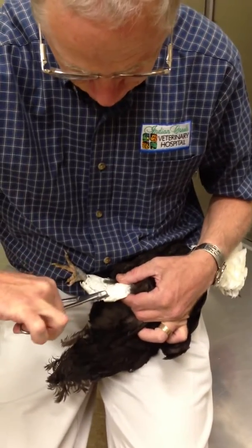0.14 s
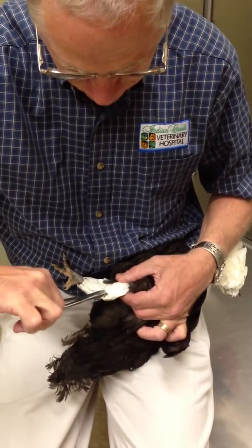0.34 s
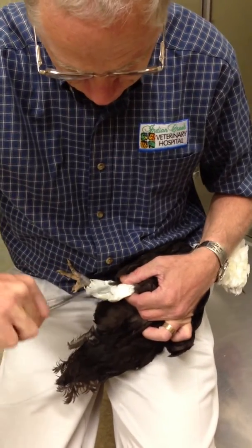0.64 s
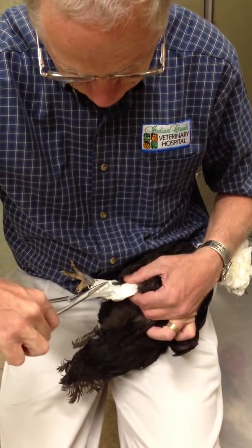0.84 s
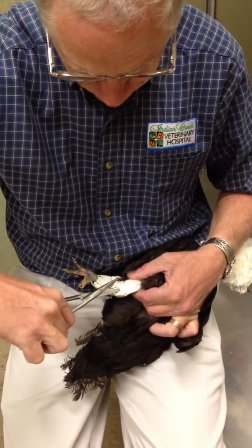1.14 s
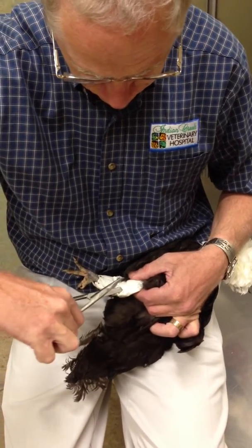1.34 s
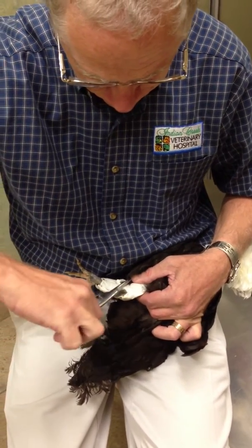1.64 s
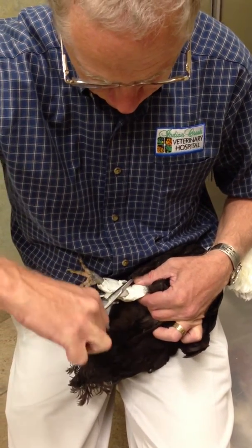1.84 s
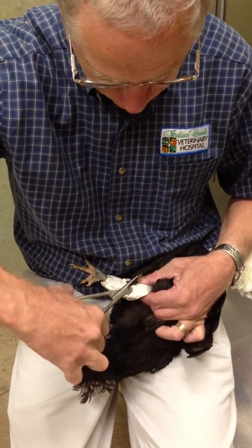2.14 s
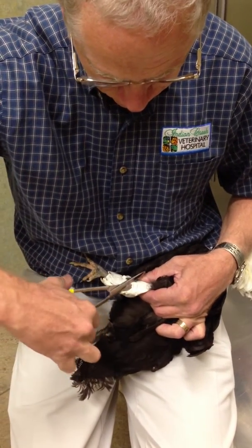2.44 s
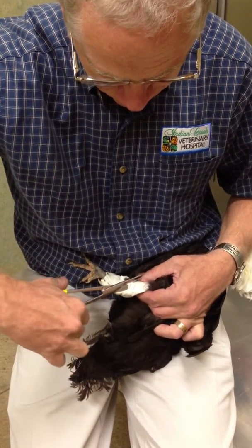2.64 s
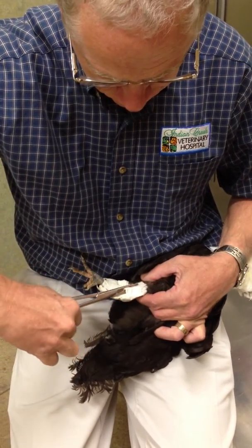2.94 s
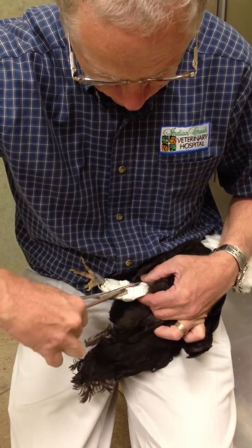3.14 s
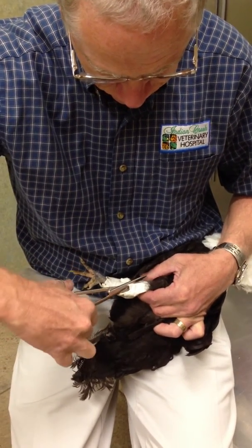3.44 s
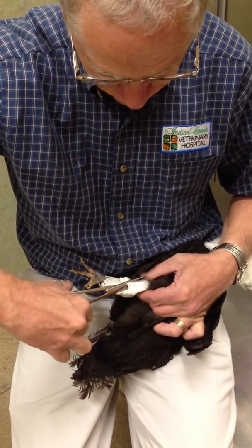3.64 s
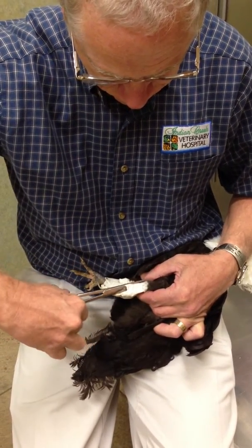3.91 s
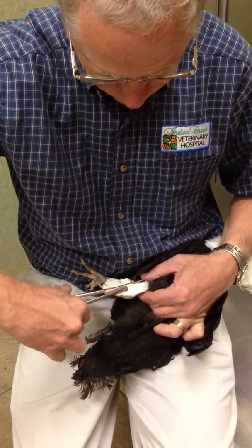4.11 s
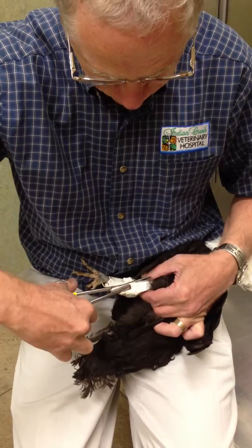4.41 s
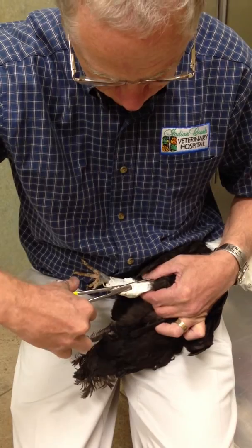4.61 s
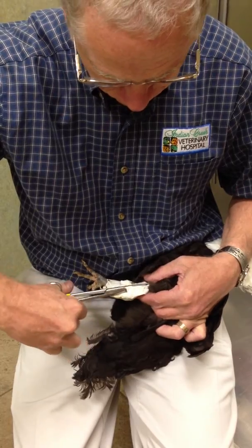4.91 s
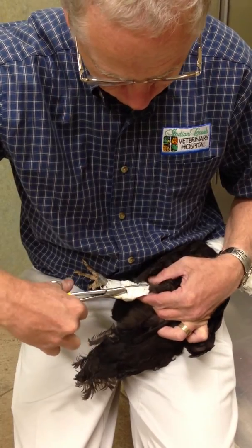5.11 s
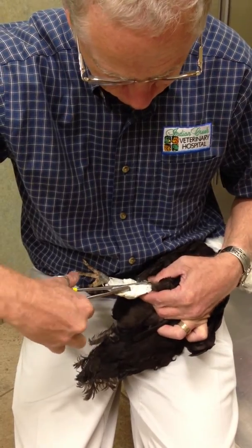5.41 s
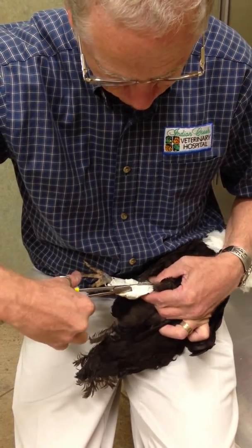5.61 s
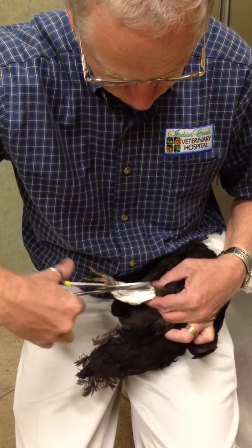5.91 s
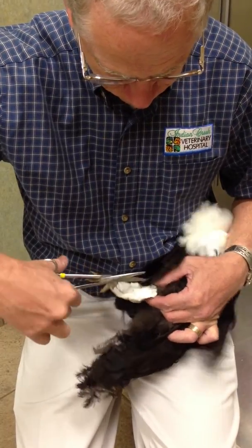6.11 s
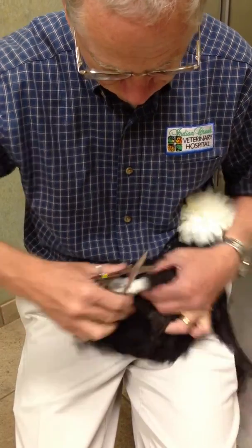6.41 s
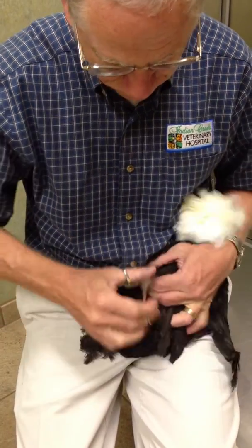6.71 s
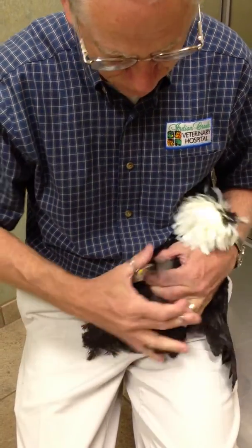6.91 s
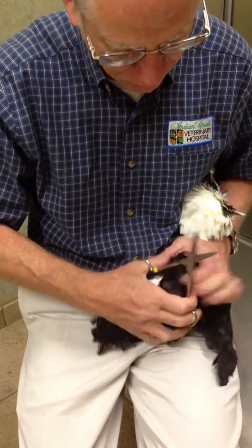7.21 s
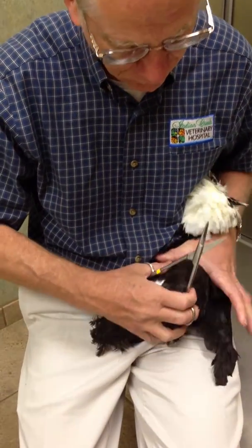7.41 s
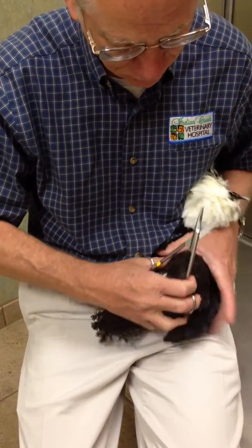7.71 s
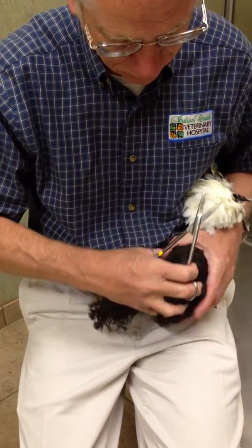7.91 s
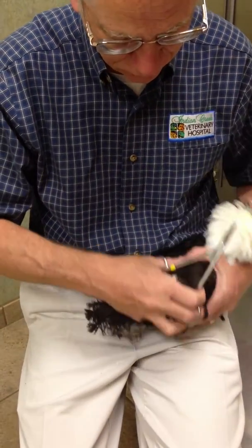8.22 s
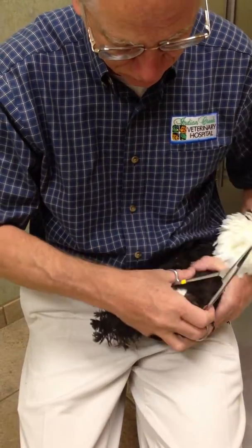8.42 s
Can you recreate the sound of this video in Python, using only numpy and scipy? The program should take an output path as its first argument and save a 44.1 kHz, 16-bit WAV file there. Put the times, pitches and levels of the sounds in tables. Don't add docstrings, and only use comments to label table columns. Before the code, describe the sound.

Loud, raspy hen squawks, each after a wheezy indrawn breath, build to a flurried cry and scattered clucks in a small echoing room with humming air.

```python
import sys
import numpy as np
from scipy import signal
from scipy.io import wavfile
from scipy.ndimage import uniform_filter1d

SR = 44100
rng = np.random.default_rng(int(sys.argv[2]) if len(sys.argv) > 2 else 0)


def volts_from_db(level):
    exponent = np.asarray(level, float) / 20
    return 10 ** exponent


def to_wav(sig):
    pcm = np.clip(np.atleast_2d(sig), -1, 1) * 32767
    pcm = np.round(pcm).astype(np.int16)
    wavfile.write(sys.argv[1], SR, pcm.T)


N = 377083
LEAD = SR // 4


def evened(x):
    return x / np.sqrt(np.mean(x ** 2) + 1e-20)


def read(points, hz):
    f, value = np.transpose(points)
    return np.interp(np.log(hz + 1), np.log(f + 1), value)


def add(mix, start, sound):
    part = mix[LEAD + round(start * SR):][:len(sound)]
    part += sound[:len(part)]


def unfold(rows):
    s, *columns = np.transpose(rows)
    t = np.arange(s[0], s[-1], 1 / SR)
    return s[0], [np.interp(t, s, column) for column in columns]


def resonate(x, hz, width):
    turn = np.exp(2j * np.pi * np.cumsum(hz * np.ones(len(x))) / SR)
    r = np.exp(-np.pi * width / SR)
    smooth = signal.lfilter([(1 - r) ** 2], [1, -2 * r, r ** 2], x / turn)
    return 2 * (turn * smooth).real


def cavity(x, modes):
    return evened(sum((-1) ** k * volts_from_db(db) * resonate(x, hz, width) for k, (hz, width, db) in enumerate(modes)))


def noise(spectrum, patchy_db):
    a, b, patches = rng.standard_normal(((N + LEAD) // 256 + 5, 513, 3)).T
    patches = uniform_filter1d(patches, size=12, axis=0)
    patches = evened(uniform_filter1d(patches, size=12, axis=1))
    colour_db = read(spectrum, np.fft.rfftfreq(1024, 1 / SR))[:, None]
    z = (a + 1j * b) * volts_from_db(colour_db + patchy_db * patches)
    return evened(signal.istft(z, nperseg=1024, noverlap=768)[1][:N + LEAD])


# frequency in Hz, level in dB per Hz.
DUCT_COLOUR = [(24, -53), (40, -23), (84, -16), (98, -26), (114, -28), (146, 1.5), (222, -7.5), (339, -4),
               (394, -12), (517, -14), (557, -13.5), (770, -15.5), (1470, -20), (3170, -30), (15200, -35)]
# frequency in Hz, width in Hz, level in dB.
MOTOR_LINES = [(122, 8.8, -64.5), (171.5, 20, -73), (232.2, 15.7, -61), (2820, 3000, -72.5)]


def ventilation():
    hiss = rng.standard_normal(N + LEAD)
    lines = sum(volts_from_db(db) * evened(resonate(hiss, hz, width)) for hz, width, db in MOTOR_LINES)
    return volts_from_db(-56) * noise(DUCT_COLOUR, patchy_db=-2.5) + lines


# frequency in Hz, width in Hz, level in dB.
MOUTH_RASP = [(5490, 2340, 14), (8110, 1480, 16.5), (9800, 5500, 7.5)]


def cry(rows, shape, grain, harsh_db):
    start, (effort_db, hz, beak_db, rasp_db) = unfold(rows)
    rough, alternation = grain
    overtone_db, first_hz, width, second_hz, second_db, palate_db = shape

    wobble = evened(uniform_filter1d(rng.standard_normal(len(hz)), size=120))
    turns = np.cumsum(hz * (1 + .06 * rough * wobble)) / SR
    pulses = evened(sum(np.cos(2 * np.pi * k * turns) for k in range(1, 22)))
    folds = (1 - rough) * pulses * (1 + alternation * np.cos(np.pi * turns))
    puff_shape = .2 + np.exp(-(turns % 1) / .35)
    puffs = rough * evened(puff_shape * rng.standard_normal(len(hz)))
    shimmer = volts_from_db(4 * rough * evened(uniform_filter1d(rng.standard_normal(len(hz)), size=250)))

    windpipe = [(hz, 330, 0), (1.73 * hz, 400, overtone_db)]
    lifted_hz = first_hz * (1 + 0.03 * (beak_db - beak_db.max()))
    beak = [(lifted_hz, width, 0), (second_hz, 500, second_db), (4600, 1100, palate_db)]
    low = cavity(folds + .8 * puffs, windpipe)
    middle = cavity(folds + 1.4 * puffs, beak)
    high = cavity(folds + 7.7 * puffs, MOUTH_RASP)

    harsh = cavity(puffs, [(870, 860, 3.6), (1420, 820, 1.6)])
    harsh = harsh + volts_from_db(beak_db - 1.5) * cavity(puffs, [(2610, 1330, -3.5), (4010, 590, -4.5)])
    voice = low + volts_from_db(harsh_db) * harsh + volts_from_db(beak_db) * middle + volts_from_db(rasp_db) * high
    return start, volts_from_db(effort_db) * shimmer * voice * signal.windows.tukey(len(hz), .08)


def call_arch(top, rise, hold, fall, db, hz, beak_db, end_db, end_share, rule):
    s = top + np.array([-rise, -rise / 2, 0, hold, hold + .45 * fall, hold + fall])
    effort_db = db + np.array([rule["start_db"], rule["half_db"], 0, 0, end_db / 2 + rule["slump_db"], end_db])
    falling_share = 1 + .42 * (end_share - 1)
    pitch = hz * np.array([rule["start_share"], rule["half_share"], 1, 1, falling_share, end_share])
    close_db = rule["close_db"]
    opening_db = beak_db + np.array([rule["shut_db"], rule["open_db"], 0, 0.25 * close_db, close_db, close_db])
    return np.transpose([s, effort_db, pitch, opening_db])


# top reached in seconds, hold in s, fall in s, effort in dB, top pitch in Hz.
SQUAWK_CALLS = [
    (-.075, 0.011, .035, -31, 607),
    (0.628, 0.018, 0.042, -29, 582.8),
    (2.024, 0.0085, 0.048, -26, 626.4),
    (2.876, 0.0093, 0.068, -26, 647.5),
    (3.646, 0.036, 0.046, -24, 673.8),
    (4.511, .01, .063, -23.5, 669.3),
    (5.288, 0.037, 0.063, -23, 689),
    (5.908, 0.018, 0.049, -21.5, 713),
]
SQUAWK_CLIMBS = [.045, .035, .044, .036, .026, .047, .037, .046]
# time in seconds, effort in dB, pitch in Hz, beak opening in dB.
STRUGGLE_HEAVES = [
    [(6.2, -31, 394, -30), (6.225, -33, 503, -5.5), (6.26, -32, 560.3, 2.5), (6.3, -33, 503.7, 0.5),
     (6.35, -33.5, 552, 10)],
    [(6.345, -25.5, 544, -4), (6.37, -28, 576, 3.5), (6.42, -28.5, 589.4, -6), (6.47, -42, 609.5, -16)],
]
# top reached in seconds, rise in s, fall in s, effort in dB, top pitch in Hz.
CLUCK_CALLS = [
    (6.544, 0.0061, 0.063, -24.5, 529.8),
    (6.57, .02, 0.016, -30.5, 633),
    (6.814, 0.0085, 0.011, -37, 563),
    (6.855, .01, 0.0053, -39.5, 475.6),
    (7.3, 0.024, .016, -30.5, 494.3),
    (7.381, .026, .046, -27, 581.4),
    (8.247, 0.0056, 0.024, -29.5, 522),
]
SQUAWK_SHAPE = dict(start_db=-15, half_db=-9, start_share=.75, half_share=.87, slump_db=-4.5, shut_db=-5, open_db=1.5, close_db=-9)
CLUCK_SHAPE = dict(start_db=-4.5, half_db=-2.5, start_share=.93, half_share=0.93, slump_db=-4.5, shut_db=-12, open_db=-2, close_db=-5)
# beak opening in dB, windpipe overtone in dB, first beak Hz, second Hz, second in dB.
CALL_BEAKS = [(1, 1.5, 2200, 3500, -6), (3.5, 1.5, 2500, 3370, 2.5), (4.5, 0, 2440, 3430, -3),
              (5, 1.5, 2550, 3420, -1), (1, 4.5, 2600, 3680, -3.5), (3.5, 6.5, 2610, 3530, 0.5),
              (2, 4.5, 2620, 3730, -1), (2, 6.5, 2590, 3740, -9.5), (0, 8.5, 2310, 3250, -8.5),
              (0, 4.5, 2150, 3000, -10.5), (-13.5, 5.5, 1550, 2890, -10), (-10.5, -7, 2220, 2960, -3),
              (-11, -6, 2550, 3840, -2), (-4, 2, 1860, 3040, -2), (-4, -28, 2230, 3980, -6),
              (-4.5, -18, 1480, 2200, -24), (0.5, -29, 1710, 2640, -5.5)]
# rasp under beak in dB, palate in dB, beak width in Hz, last effort in dB, last pitch share.
CALL_THROATS = [(-18, -16, 1040, -4, .85), (-13.5, -10.5, 650, -0.5, .87), (-11.5, -12, 830, -1.5, .81),
                (-11, -9.5, 680, -4, .8), (-11.5, -10.5, 1100, -7, .79), (-12.5, -6, 1160, -3, .8),
                (-10.5, -9.5, 1230, -2, .77), (-14.5, -11.5, 1000, -1.5, .82), (-27, -19, 860, 0, 1),
                (-27, -23, 550, 0, 1), (-16, -20, 320, -18.5, 0.84), (-18, -9, 770, 0, 1.08),
                (-18, -18, 740, -23, 0.9), (-17.5, -21, 700, 1, 0.96), (-9.5, -24, 940, 3, 1.5),
                (-17, -38, 340, -4.5, .89), (-27, -40, 550, -35, 0.85)]
CALL_GRAINS = [(.45, .1), (.38, .1), (.5, .2), (.45, .2), (.26, 0), (.4, .1), (.17, 0), (.19, 0), (.48, .9),
               (.4, .4), (.32, .2), (.3, 0), (.35, 0), (.3, 0), (.2, 0), (.27, .1), (.24, 0)]


def calls():
    squawks = [(top, rise, *rest, SQUAWK_SHAPE) for (top, *rest), rise in zip(SQUAWK_CALLS, SQUAWK_CLIMBS)]
    cluck_hold_s = .004
    clucks = [(top, rise, cluck_hold_s, *rest, CLUCK_SHAPE) for top, rise, *rest in CLUCK_CALLS]
    plan = squawks + STRUGGLE_HEAVES + clucks
    for row, beak, throat, grain in zip(plan, CALL_BEAKS, CALL_THROATS, CALL_GRAINS):
        beak_db, overtone_db, first_hz, second_hz, second_db = beak
        rasp_db, palate_db, width, end_db, end_share = throat
        if row in STRUGGLE_HEAVES:
            rows = np.array(row)
        else:
            *timing, rule = row
            rows = call_arch(*timing, beak_db, end_db, end_share, rule)
        rows = np.c_[rows, rasp_db + beak_db + 1.4 * (rows[:, 3] - beak_db)]
        shape = overtone_db, first_hz, width, second_hz, second_db, palate_db
        harsh_db = -16 + 22 * grain[0]
        yield cry(rows, shape, grain, harsh_db)


def wheeze(rows, upper_hz, upper_db, width):
    start, (level_db, low_db, low_hz, high_hz, hiss_db) = unfold(rows)
    air = rng.standard_normal(len(low_hz))
    low = evened(resonate(air, low_hz, 370))
    high = cavity(air, [(high_hz, width, 0), (upper_hz, width, upper_db), (4500, 1200, -16.)])
    breath = volts_from_db(low_db) * low + high + volts_from_db(hiss_db - 12.5) * cavity(air, MOUTH_RASP)
    return start, volts_from_db(level_db - 3.0) * breath * signal.windows.tukey(len(air), .2)


def intake(start, length, catch_db, end_db, hz, whistle_db, upper_db, width, climb, hiss_db, rule):
    s = start + np.array([0, rule["catch_s"], rule["catch_s"] + 0.16 * length, length])
    level_db = [catch_db, catch_db, catch_db + rule["slump_db"], end_db]
    low_db = whistle_db + rule["linger_db"] * np.array([0, 0, 1, 0])
    pipe_hz = hz * (1 + climb * ((s - start) / length - .5))
    steady_hiss_db = 0 * s + hiss_db + rule["hiss_db"]
    rows = np.transpose([s, level_db, low_db, 0.42 * pipe_hz, pipe_hz, steady_hiss_db])
    return wheeze(rows, 1.466 * hz, upper_db, width)


# start in seconds, length in s, catch in dB, end in dB, windpipe in Hz.
AIR_SIPS = [(0.441, .045, -48, -62, 1990), (1.822, 0.052, -64, -42, 2100), (2.645, 0.07, -43.5, -53, 2170),
            (3.392, 0.17, -51.5, -44, 2460), (4.244, 0.114, -51, -48.5, 2300),
            (5.038, 0.0365, -44, -38, 2200), (5.674, 0.066, -40, -41, 2200)]
AIR_DRAWS = [(0.492, 0.1, -52.5, -35, 2200), (1.903, 0.0374, -37, -35, 2180),
             (1.949, 0.056, -39.5, -16.5, 2170), (2.713, 0.14, -40, -26, 2220),
             (3.553, 0.087, -32.5, -21, 2420), (4.363, 0.11, -34, -31.5, 2430),
             (5.072, 0.183, -40, -26.5, 2420), (5.734, 0.169, -39.5, -25.5, 2510),
             (8.137, 0.123, -41.5, -39.5, 1720)]
SIP_MANNER = dict(catch_s=0.014, slump_db=-10, linger_db=7.5, hiss_db=-6.5)
DRAW_MANNER = dict(catch_s=.02, slump_db=0, linger_db=0.5, hiss_db=-6)
# low whistle in dB, upper resonance in dB, width in Hz, windpipe climb 0-1.
INTAKE_PIPES = [(0, -7, 940, 0.1), (-3, 2, 640, 0.2), (-5.5, -13, 620, -.01), (-1, -3, 480, 0.25),
                (1.5, -8, 450, 0.27), (1.5, -1, 540, 0.1), (1.5, -11, 510, 0.28), (-14, .5, 330, 0.35),
                (-10.5, -7, 630, 0.1), (-11, 2, 240, 0.16), (-12, -6.5, 440, 0), (-8.5, -7, 860, 0.14),
                (-6, -9, 730, 0.05), (-5.5, -9.5, 630, 0.15), (-0.5, -18, 740, .07), (-6, -4.5, 650, 0)]
INTAKE_HISS = [-8, -8, -10, -1, -8, 5, 0, 2, 0.5, -4, 1.5, 1.5, 2.5, 2, -1, -5]


def intakes():
    manners = [SIP_MANNER] * len(AIR_SIPS) + [DRAW_MANNER] * len(AIR_DRAWS)
    for row, pipe, hiss_db, manner in zip(AIR_SIPS + AIR_DRAWS, INTAKE_PIPES, INTAKE_HISS, manners):
        yield intake(*row, *pipe, hiss_db, manner)


# start in seconds, length in s, first Hz, last Hz, level in dB.
INTAKE_SQUEAKS = [
    (1.826, .036, 930, 1100, -52),
    (3.428, .04, 1050, 1210, -49),
    (4.282, .042, 1020, 1170, -48),
]


def squeaks():
    for start, length, first_hz, last_hz, db in INTAKE_SQUEAKS:
        turns = np.cumsum(np.linspace(first_hz, last_hz, round(length * SR))) / SR
        partials_db = [-5., 3., -4.]
        tone = sum(volts_from_db(part_db) * np.sin(2 * np.pi * (k + 1) * turns) for k, part_db in enumerate(partials_db))
        yield start, volts_from_db(db) * tone * signal.windows.tukey(len(turns), .6)


# time in seconds, peak in dB.
CLAW_TICKS = [(1.939, -60), (4.825, -66), (5.72, -59), (6.556, -57.5), (6.653, -63), (7.178, -51),
              (7.228, -61), (7.384, -62)]
# start in seconds, rise in s, fall in s, peak in dB.
FEATHER_STROKES = [
    (4.78, .04, 0.047, -54),
    (6.3, 0.098, 0.12, -44),
    (6.45, 0.12, .06, -54),
    (6.6, 0.064, 0.15, -53.5),
    (7.13, 0.034, 0.12, -53),
    (7.63, 0.062, 0.11, -50.5),
]
# frequency in Hz, level in dB per Hz.
FEATHER_COLOUR = [(1200, 8), (2000, 9.5), (3500, 8.5), (6000, 4.5), (10000, -1.5), (15300, -7)]


def rustle():
    level, ticks = np.zeros((2, N + LEAD))
    for start, db in CLAW_TICKS:
        add(ticks, start, volts_from_db(db - 60 * np.arange(1500) / SR / .04))
    for start, rise, fall, db in FEATHER_STROKES:
        edge_db = db - 4
        stroke = [(start, edge_db), (start + rise, db), (start + rise + fall, edge_db)]
        start, (level_db,) = unfold(stroke)
        add(level, start, volts_from_db(level_db - 14.0) * signal.windows.tukey(len(level_db), .2))
    grain = volts_from_db(3 * evened(uniform_filter1d(rng.standard_normal(N + LEAD), size=90)))
    bright = cavity(rng.standard_normal(N + LEAD), [(8950, 940, -4), (12700, 4000, -9.0), (5000, 3700, -19)])
    return level * grain * noise(FEATHER_COLOUR, patchy_db=2) + ticks * bright


# frequency in Hz, time to fall 60 dB in seconds.
WALL_DECAY = [(300, 0.75), (650, 0.76), (1200, 0.92), (1800, 0.6), (3000, 0.61), (6000, 0.53), (11000, 0.3)]
# delay in seconds, level in dB.
WALL_ECHOES = [(.004, -15), (.009, -4.5), (.013, -12), (.019, -10.5), (.027, -4), (.062, -22.5),
               (.078, -10.5)]


def room(x):
    taps = np.zeros(SR)
    at = np.arange(440, SR - 20, 20)
    taps[at + rng.integers(0, 20, len(at))] = rng.choice([-1., 1.], len(at))
    hz, t, z = signal.stft(taps, SR, nperseg=256)
    decay = volts_from_db(-60 * t / read(WALL_DECAY, hz)[:, None])
    tail = signal.istft(z * decay, SR, nperseg=256)[1]
    tail *= volts_from_db(-2) / np.linalg.norm(tail)
    tail[0] += 1
    for delay, db in WALL_ECHOES:
        tail[round(delay * SR)] += volts_from_db(db - 5)
    return signal.fftconvolve(x, tail / np.linalg.norm(tail))[:len(x)]


def scene():
    air = ventilation()
    hen = np.zeros(N + LEAD)
    for voices in (calls(), intakes(), squeaks()):
        for start, sound in voices:
            add(hen, start, sound)
    small_body = signal.butter(6, 440, "highpass", fs=SR, output="sos")
    hen = signal.sosfilt(small_body, hen)
    feathers = rustle()
    return (room(hen + 1.63 * feathers) + feathers + air)[None, LEAD:]


def low_pass(x):
    return signal.sosfilt(signal.butter(12, 15340, fs=SR, output="sos"), x)


def record(dry):
    bass_cut = signal.butter(1, 90, "highpass", fs=SR, output="sos")
    top_cut = signal.firwin(255, 15300, fs=SR)
    heard = signal.oaconvolve(signal.sosfilt(bass_cut, dry), top_cut[None], "same")
    return low_pass(heard)


dry = scene()
out = record(dry)
to_wav(out)
```